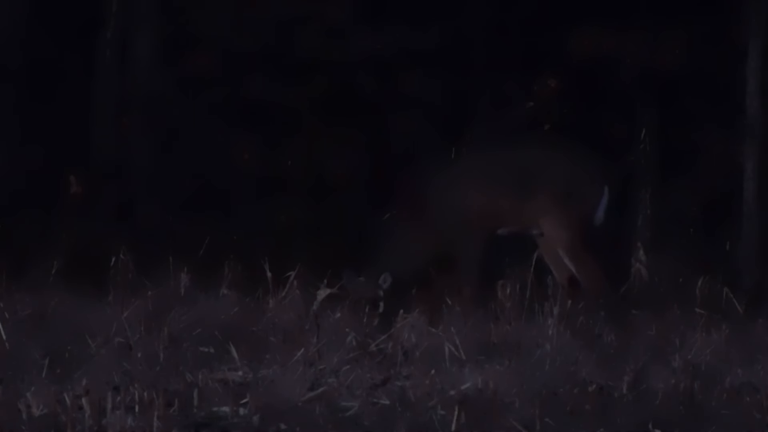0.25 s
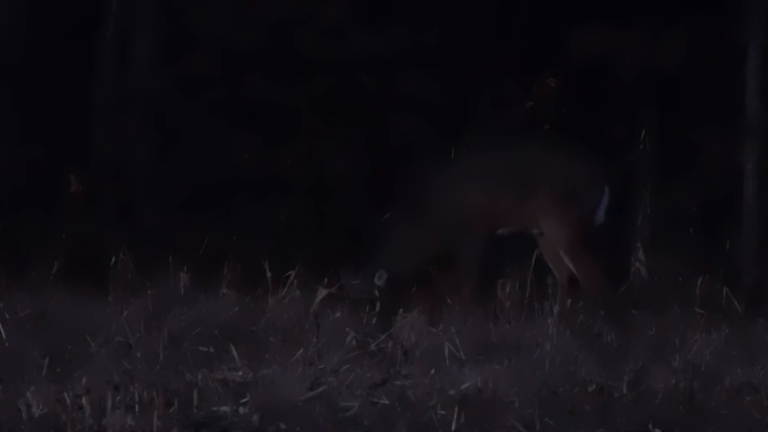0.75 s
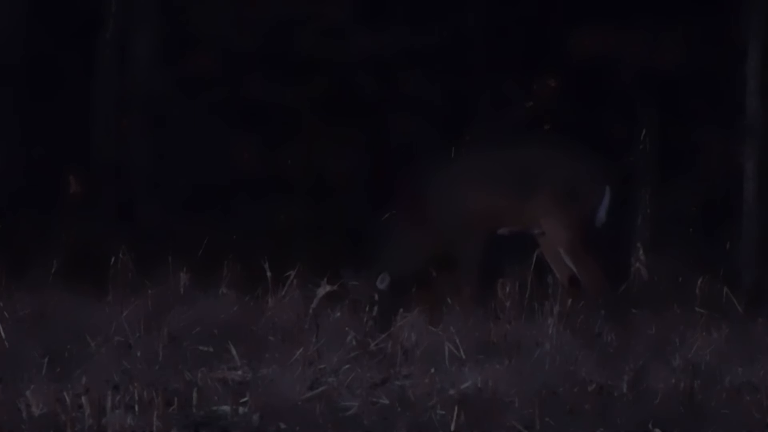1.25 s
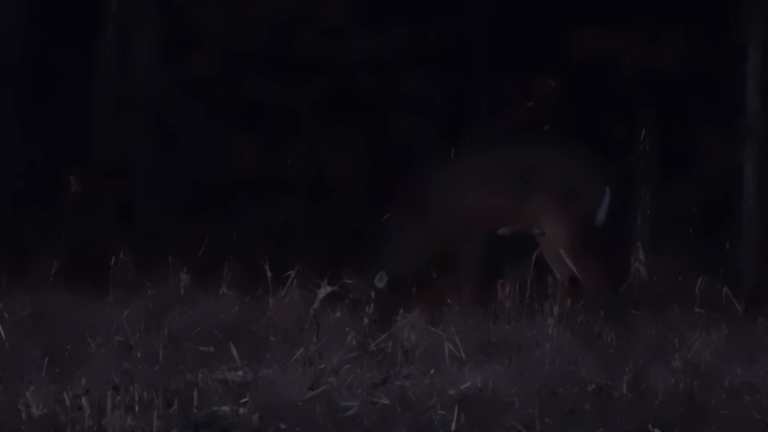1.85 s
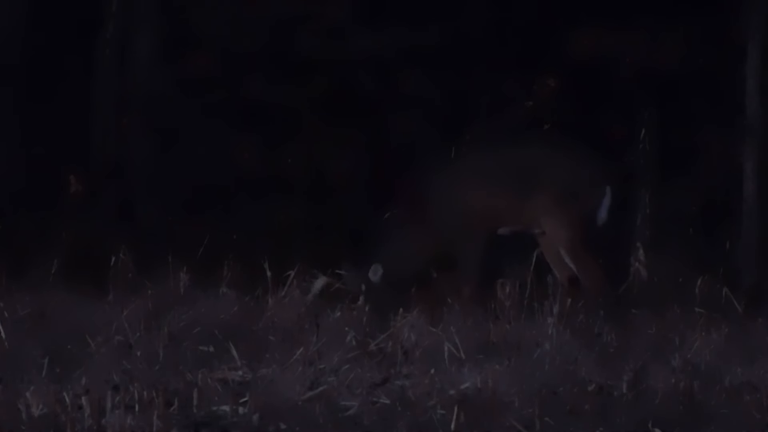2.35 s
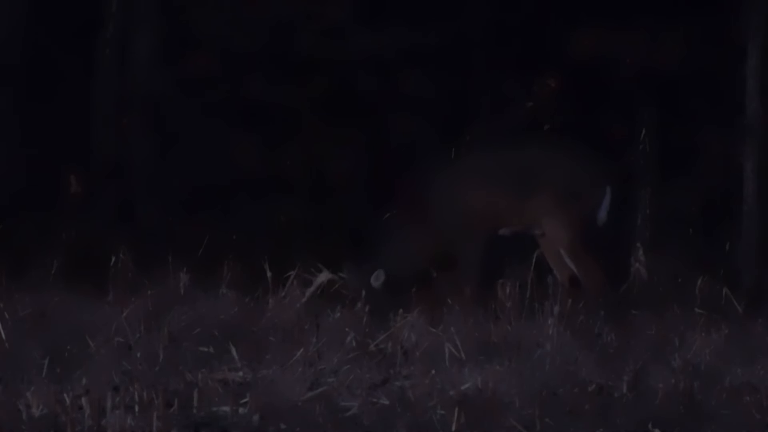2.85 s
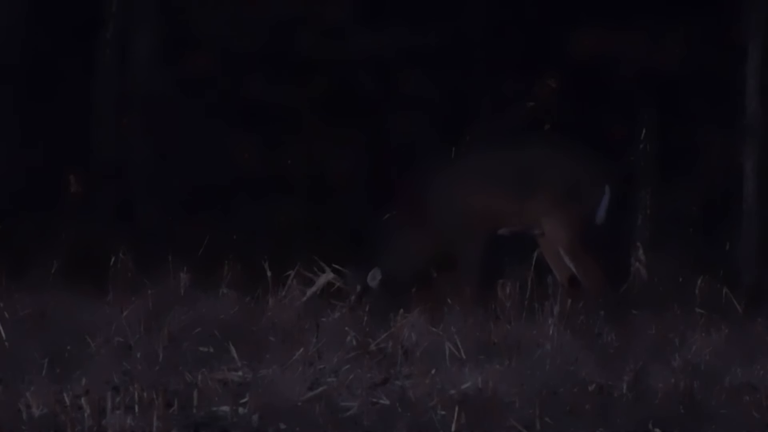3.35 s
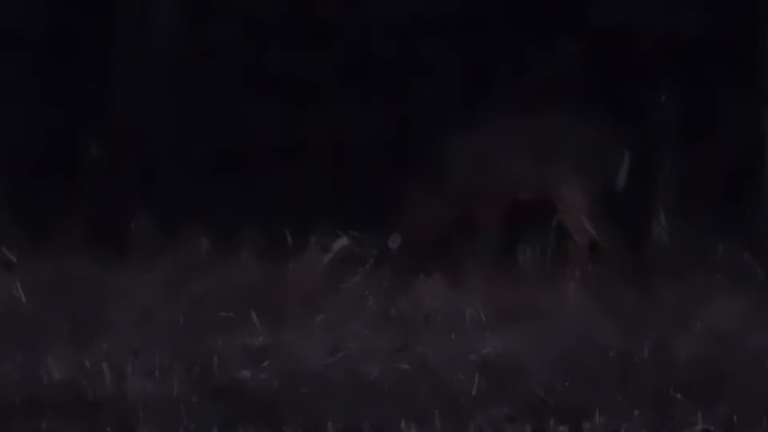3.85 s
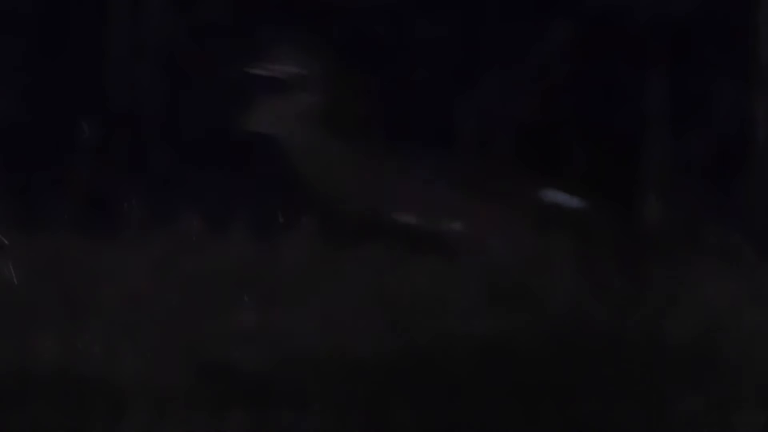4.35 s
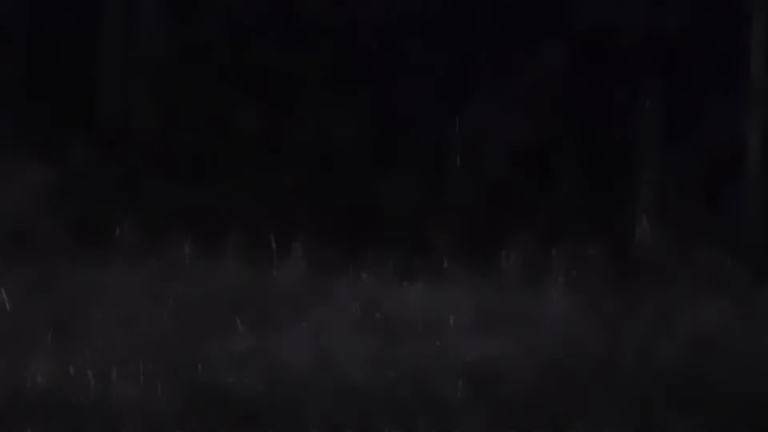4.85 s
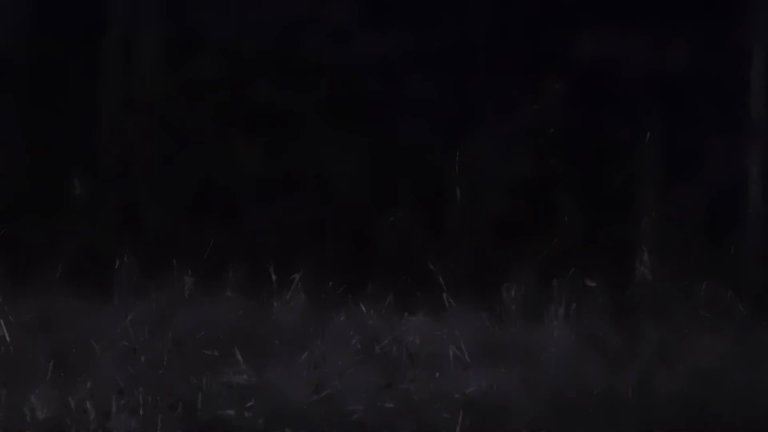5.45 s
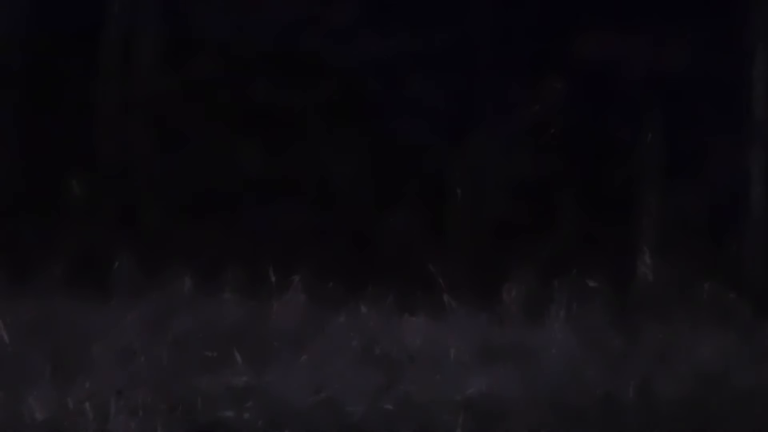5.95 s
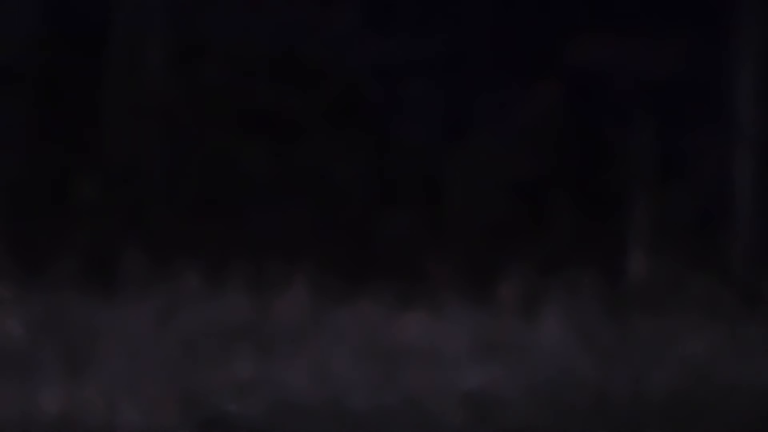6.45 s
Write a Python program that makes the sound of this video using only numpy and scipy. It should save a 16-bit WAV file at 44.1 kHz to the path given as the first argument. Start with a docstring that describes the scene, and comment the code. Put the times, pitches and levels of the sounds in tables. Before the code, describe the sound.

Outdoors at a field edge, thin buzzy bird chips come about once a second over a barely audible low airy rush. One violent rifle crack bursts in, distorted at the microphone, with a hollow boom and ragged tree echoes. Under a second later the far tree line answers with a bright surge, then a deeper rumbling roll. It dies away, leaving hush, a tiny cricket trill and soft knocks.

```python
"""One rifle shot from the edge of a field at dusk: a noise burst, then slow damped sines.
Nearby trees scatter it back as dense coloured impulses, with distinct echoes as short tone bursts.
A second swell rolls in from the far woods as layers of coloured noise and sparse impulses.
Swept bird chips, a pulsed cricket tone, damped-mode knocks and coloured noise form the quiet field.
The loud blast overloads the microphone input; two faint clicks come late."""
import sys
import numpy as np
from scipy import signal
from scipy.fft import rfft, irfft, next_fast_len
from scipy.io import wavfile
from scipy.ndimage import uniform_filter1d

SR = 44100
rng = np.random.default_rng(int(sys.argv[2]) if len(sys.argv) > 2 else 0)


def int16_out(signal):
    """Quantize to a 16-bit WAV file."""
    q = np.round(np.clip(np.atleast_2d(signal).T, -1, 1) * 32767)
    wavfile.write(sys.argv[1], SR, q.astype(np.int16))


N = 294588
TIME = np.arange(N) / SR
SHOT_S = 3.478


def from_db(db):
    """Level and amplitude: twenty decibels are a factor of ten in gain."""
    return 10 ** (np.asarray(db) / 20)


def rms_one(x):
    """Normalization: scale a signal to a root mean square of one."""
    return x / np.sqrt(np.mean(x ** 2) + 1e-20)


def at_hz(points, hz):
    """Logarithmic pitch: interpolate a table along a log-frequency axis."""
    table_hz, value = np.transpose(points)
    return np.interp(np.log(hz + 1e-3), np.log(table_hz), value)


def white():
    """White noise: two independent channels with equal power at all frequencies."""
    return rng.standard_normal((2, N))


def coloured(pair, colour, likeness):
    """Interchannel coherence: mix mid and side by frequency after shaping the spectrum; rms 1."""
    size = next_fast_len(N)
    hz = np.arange(size // 2 + 1) * SR / size
    mid, side = rfft(pair, size) * from_db(at_hz(colour, hz))
    alike = np.clip(at_hz(likeness, hz), -1, 1)
    common = np.sqrt(1 + alike) * mid
    opposed = np.sqrt(1 - alike) * side * [[1], [-1]]
    return rms_one(irfft(common + opposed, size)[:, :N])


def reflections(per_s, spread_db):
    """Random scattering: small echoes of uneven size and either sign at random moments."""
    signs = rng.choice([-1, 1], (2, N))
    sizes = from_db(spread_db * np.clip(white(), -2, 2)) * signs
    return sizes * (rng.random((2, N)) < per_s / SR)


def absorbed(x, loss, since_s, earliest_s):
    """Frequency-dependent decay: each octave follows its own dB-per-second slope; negative rises."""
    size = next_fast_len(N)
    octave = np.log2(np.arange(size // 2 + 1) * SR / size + 1)
    centres = 62.5 * 2. ** np.arange(9)
    elapsed_s = np.maximum(TIME, earliest_s) - since_s
    spectrum, out = rfft(x, size), 0
    for hz, only in zip(centres, np.eye(len(centres))):
        # overlapping triangular bands that sum to the whole spectrum
        band = irfft(spectrum * np.interp(octave, np.log2(centres), only), size)[:, :N]
        out = out + band * from_db(-at_hz(loss, hz) * elapsed_s)
    return out


def ring(start_s, hz, t60):
    """Damped resonance: a sine loses 60 dB in t60 seconds."""
    out, first = np.zeros(N), int(start_s * SR)
    age = TIME[:min(N - first, int(2 * t60 * SR))]
    out[first:first + len(age)] = np.sin(2 * np.pi * hz * age) * from_db(-60 * age / t60)
    return out


def swell(peak_s, hold_s, level_db, rise_db_per_s, fall_db_per_s):
    """Exponential growth and decay: constant dB slopes on either side of a held peak."""
    early = np.maximum(peak_s - TIME, 0)
    late = np.maximum(TIME - peak_s - hold_s, 0)
    return from_db(level_db - rise_db_per_s * early - fall_db_per_s * late)


def fade_in(start_s, attack_s):
    """Linear onset: a straight ramp from silence to full level."""
    return np.clip((TIME - start_s) / attack_s, 0, 1)


def among_trees(x, t60, wet_db):
    """Diffuse reverberation: convolve a call with decaying noise, different on each side."""
    age = TIME[:SR // 2]
    tail = rng.standard_normal((2, len(age))) * from_db(-60 * age / t60)
    tail /= np.sqrt(np.sum(tail ** 2, axis=1, keepdims=True))
    wet = signal.fftconvolve(x[None], tail, axes=1)[:, :N]
    return from_db(-4.5) * x + from_db(wet_db) * wet


# Spectra of the faraway rush and the microphone hiss: frequency_hz, relative level_db
RUSH_COLOUR = [(15, -33), (25, 3.5), (38, -7.5), (69, -0.5), (92, -9), (152, -10), (201, -16), (250, -14.5),
               (294, -14), (536, -14.5), (616, -15.5), (655, -10), (884, -8.5), (1190, -11), (3000, -38),
               (3900, -74.5), (6600, -120)]
HISS_COLOUR = [(1500, -6), (3000, -3), (6000, -8), (10000, -6.5), (15500, -6.5)]
# Left-right likeness of the evening air: frequency_hz, correlation (no unit)
AIR_LIKENESS = [(50, .93), (200, .77), (700, .73), (1400, .58), (2800, .05), (10000, 0)]


def evening_air():
    """Superposed noise floors: a faraway rush grows slowly, then stays, over microphone hiss."""
    level_db = -55.5 + 0.9 * np.minimum(TIME, 3.3)   # grows 0.9 dB per s until 3.3 s
    rush = from_db(level_db) * coloured(white(), RUSH_COLOUR, AIR_LIKENESS)
    return rush + from_db(-68.5) * coloured(white(), HISS_COLOUR, AIR_LIKENESS)


# Cricket trills before the output gain: start_s (first full pulse), end_s, pulses_per_s, level_db
TRILLS = [(1.714, 2.165, 23.4, -71), (6.322, 6.512, 23.8, -69)]


def cricket():
    """Amplitude modulation: each wing stroke is one pulse of a pure tone, weaker at the start."""
    envelope = np.zeros(N)
    for start, end, per_s, level_db in TRILLS:
        age = TIME - start
        strokes = np.maximum(np.cos(2 * np.pi * per_s * age), 0)
        onset = fade_in(start - .045, 0.075)
        envelope += from_db(level_db) * strokes * onset * (TIME < end)
    tone = np.sin(2 * np.pi * 3265 * TIME)
    return among_trees(envelope * tone, t60=.1, wet_db=-10) * from_db(6.5)


# Bird chips before envelope and tree gains: start_s, level_db, reference pitch_hz
CHIPS = [(.203, -53.5, 6000), (.985, -57.5, 6020), (1.742, -53.5, 6150), (2.273, -51.5, 6000),
         (2.929, -50.5, 5950)]


def bird():
    """Frequency modulation: buzzy, unsteady chips sweep up and hook down, loudest after the hook."""
    out = np.zeros(N)
    up_s, hook_s, hold_s, release_s = 0.028, 0.0085, 0.01, 0.0066
    top, hooked, held, end = np.cumsum([up_s, hook_s, hold_s, release_s])
    age = TIME[:int(end * SR)]
    # all pitch movements are shares of the reference pitch
    sweep = np.interp(age, [0, top, hooked], [.77, .97, .875])
    level = from_db(np.interp(age, [top, hooked], [-6.5, 1]))
    level *= np.interp(age, [0, .004, held, end], [0, 1, 1, 0])
    buzz = .032 * np.sin(2 * np.pi * 270 * age)
    for start_s, level_db, pitch_hz in CHIPS:
        waver = 0.024 * rms_one(uniform_filter1d(rng.standard_normal(len(age)), size=60))
        phase = 2 * np.pi * np.cumsum(pitch_hz * sweep * (1 + buzz + waver)) / SR
        first = int(start_s * SR)
        out[first:first + len(age)] += from_db(level_db) * level * np.sin(phase)
    return among_trees(out, t60=0.28, wet_db=-3.5)


# Small handling knocks before the modal gains: start_s, level_db
KNOCKS = [(.524, -38), (0.532, -43), (0.5358, -40), (.543, -49), (6.434, -36), (6.4623, -37), (6.664, -38)]
# Resonances of a knock: frequency_hz, relative level_db, t60_s
KNOCK_MODES = [(180, -12, .02), (416, 1, 0.025), (604, 3.5, 0.011), (1060, -14, .02), (1410, -6, 0.04),
               (2880, -26, .03)]


def knock():
    """Modal synthesis: soft, dead knocks close to the microphone are sums of damped resonances."""
    out = np.zeros(N)
    for start_s, level_db in KNOCKS:
        for hz, mode_db, t60 in KNOCK_MODES:
            uneven_db = rng.normal(0, 1)
            out -= ring(start_s, hz, t60) * from_db(level_db + mode_db - 4.5 + uneven_db)
    return out


def unevenness():
    """Random amplitude modulation: slow level changes make the roll very slightly uneven."""
    steps = rng.standard_normal(1000)
    return from_db(0.2 * np.interp(TIME * 27, np.arange(len(steps)), steps))   # 27 steps per s


# Spectra of the far crackle, body and rumble: frequency_hz, relative level_db
CRACKLE_COLOUR = [(300, -39), (800, 3), (1050, 1), (1300, 1), (1800, -3), (2400, -8.5), (3200, -19.5),
                  (4500, -32.5), (7000, -52.5), (12000, -54)]
BODY_COLOUR = [(150, -32), (260, -18), (340, -18), (430, -8.5), (540, -3), (700, -0.5), (900, -4.5),
               (1100, -12.5), (1500, -17), (3000, -62)]
RUMBLE_COLOUR = [(20, -33), (40, -6), (70, -0.5), (105, 3), (160, -3.5), (230, -3.5), (330, -27.5),
                 (600, -59)]
# Left-right likeness of the far echoes and the near boom: frequency_hz, correlation (no unit)
ECHO_LIKENESS = [(40, .98), (200, .99), (700, .97), (1400, .93), (2800, .83), (5300, .5), (10000, .1)]


def far_woods():
    """Delayed scattering: the tree line crackles first, then a deeper hollow roll over low rumble."""
    # absorption: frequency_hz, loss in dB per s
    loss = [(250, -4), (500, 22), (1000, -4.0), (2000, 1.0), (4000, 13.5), (8000, 23)]
    crackle = coloured(reflections(per_s=1800, spread_db=-2.5), CRACKLE_COLOUR, ECHO_LIKENESS)
    crackle = absorbed(crackle, loss, since_s=4.49, earliest_s=3.4)
    crackle_level = swell(4.445, .22, level_db=-21, rise_db_per_s=23, fall_db_per_s=19.5)
    # a wall of trees returns one bright surge
    surge_level = swell(4.58, 0, level_db=-17.5, rise_db_per_s=250, fall_db_per_s=90)
    crackle *= np.hypot(crackle_level, surge_level)

    body = coloured(reflections(per_s=6000, spread_db=0.5), BODY_COLOUR, ECHO_LIKENESS)
    body_level = swell(4.823, 0.13, level_db=-21, rise_db_per_s=18, fall_db_per_s=25)
    # the farthest returns outlast the rest of the roll
    farthest_level = swell(4.823, 0.13, level_db=-30, rise_db_per_s=18, fall_db_per_s=8)
    body *= np.hypot(body_level, farthest_level)

    rumble = coloured(white(), RUMBLE_COLOUR, ECHO_LIKENESS)
    rumble *= swell(4.39, 0.4, level_db=-38.5, rise_db_per_s=67, fall_db_per_s=11.5)
    arrival_s, attack_s = 4.18, 0.061
    roll = body * unevenness() + crackle * unevenness() + rumble
    return fade_in(arrival_s - attack_s, attack_s) * roll


# Short tone bursts, before the common gain: echo slaps, then two faint late clicks.
# Columns: start_s, level_db, pitch_hz
SLAPS_AND_CLICKS = [(3.699, -18, 1310), (3.7988, -9, 1450), (3.8018, 1, 850), (3.846, -10, 967),
                    (3.913, -11, 1400), (3.971, -8, 2137), (3.9719, -5, 906), (4.0245, -14.5, 2450),
                    (4.4785, -7, 1220), (4.4815, -6, 2180), (4.577, -5, 1800), (4.600, -10, 1200),
                    (4.622, -27, 1190), (4.897, -1, 830), (4.945, -10, 776), (5.052, -8, 764),
                    (6.400, -32, 850), (6.462, -27, 860)]
# Dull thuds among the echoes, before the common gain: start_s, level_db, pitch_hz
THUDS = [(3.797, -23, 101), (4.325, -26.5, 154.9), (4.362, -30.5, 150), (4.527, -25, 117),
         (5.04, -31.5, 102)]


def tone_bursts(rows, rise_cycles, gain_db):
    """Pulsed tones: each burst swells and dies within a few cycles, a little apart on each side."""
    out = np.zeros((2, N))
    lags = rng.normal(0, .00005, (len(rows), 2))   # s
    for (start_s, level_db, hz), lag in zip(rows, lags):
        span = slice(int(start_s * SR), int((start_s + .15) * SR))
        cycles = hz * np.maximum(TIME[span] - start_s - np.abs(lag[:, None]), 0)
        pulse = (cycles / rise_cycles * np.exp(1 - cycles / rise_cycles)) ** 2
        out[:, span] += from_db(level_db + gain_db) * pulse * np.sin(2 * np.pi * cycles)
    return out


# Spectra of the near scatter and its low boom: frequency_hz, relative level_db
NEAR_COLOUR = [(20, -32), (40, -23), (100, -15), (165, -11.5), (220, -8.5), (420, -4), (540, -1.5),
               (700, -2.5), (1080, -3.5), (1260, -8.5), (1650, -8), (3900, -18.5), (7100, -31),
               (15000, -40)]
BOOM_COLOUR = [(60, -51.5), (150, -18), (200, -5), (225, 2.5), (265, -6), (330, -19.5), (800, -64)]
# Left-right likeness of the near scatter and the report: frequency_hz, correlation (no unit)
NEAR_LIKENESS = [(40, .7), (90, .85), (200, .98), (700, .94), (1400, .85), (2800, .7), (5300, .35),
                 (10000, .1)]


def near_trees():
    """Multiple scattering: trunks and ground return a dense two-slope decay over a lingering boom."""
    first_s = SHOT_S + .009
    early_level = swell(first_s, .075, level_db=-2.5, rise_db_per_s=0, fall_db_per_s=133)
    linger_level = swell(first_s, 0, level_db=-9.5, rise_db_per_s=0, fall_db_per_s=31.5)
    level = np.hypot(early_level, linger_level)
    scatter = coloured(reflections(per_s=6000, spread_db=3.0), NEAR_COLOUR, NEAR_LIKENESS)
    # absorption: frequency_hz, loss in dB per s
    loss = [(60, -10), (125, -18), (250, 17.5), (500, 5.0), (1000, -1.5),
            (2000, -8.5), (4000, 1), (8000, 45.5), (16000, 65.5)]
    scatter = absorbed(scatter, loss, since_s=3.543, earliest_s=3.48)
    # the scatter starts wide and narrows within a tenth of a second
    mid = scatter.mean(axis=0)
    width = np.interp(TIME, [3.5, 3.6], [1.4, 1])
    scatter = mid + width * (scatter - mid)
    boom = coloured(white(), BOOM_COLOUR, ECHO_LIKENESS)
    boom *= swell(3.63, 0, level_db=-14.5, rise_db_per_s=298.5, fall_db_per_s=76)
    return fade_in(first_s, attack_s=0.0063) * (level * scatter + boom)


# Spectrum of the report: frequency_hz, relative level_db
REPORT_COLOUR = [(100, -13.5), (400, -5.5), (900, -12.5), (1700, -4), (2500, -17), (5000, -25.5),
                 (15000, -33.5)]


def muzzle_blast():
    """Impulsive radiation: a few ms of crack, then a pressure wave leaves the microphone swaying."""
    age = TIME - SHOT_S
    # a weak noise step 1.8 ms long, then the full burst
    soft_start = from_db(-12) * ((age > -0.0018) & (age <= 0))
    full_burst = from_db(6) * ((age > 0) & (age < .0028))
    crack = (soft_start + full_burst) * coloured(white(), REPORT_COLOUR, NEAR_LIKENESS)
    suction = from_db(-6) * ring(SHOT_S, hz=17, t60=.085)
    sway = from_db(-14.5) * ring(SHOT_S + 0.02, hz=6.5, t60=0.81)
    return crack - suction + sway


def scene():
    """Linear superposition: the shot and its echoes over the quiet field, a little to the right."""
    slaps_and_clicks = tone_bursts(SLAPS_AND_CLICKS, rise_cycles=1.45, gain_db=-2.5)
    thuds = tone_bursts(THUDS, rise_cycles=1.47, gain_db=1.5)
    shot = muzzle_blast() + near_trees() + far_woods()
    field = bird() + cricket() + knock() + evening_air()
    return (shot + slaps_and_clicks + thuds + field) * from_db([[-.3], [.3]])


def record(dry, ceiling=0.95, noise_db=-39):
    """Saturation and band limiting: the input overloads, level-following noise joins, the top is cut."""
    clipped = ceiling * dry / (1 + np.abs(dry) ** 10) ** (1 / 10)
    # white noise is added in proportion to short-term level
    short_term_level = np.sqrt(np.abs(uniform_filter1d(clipped ** 2, size=256, axis=1)))
    noise = from_db(noise_db) * short_term_level * white()
    lowpass = signal.ellip(10, .1, 80, 15600, fs=SR, output="sos")   # cutoff in Hz
    return signal.sosfilt(lowpass, clipped + noise)


dry = scene()
out = record(dry)
int16_out(out)
```